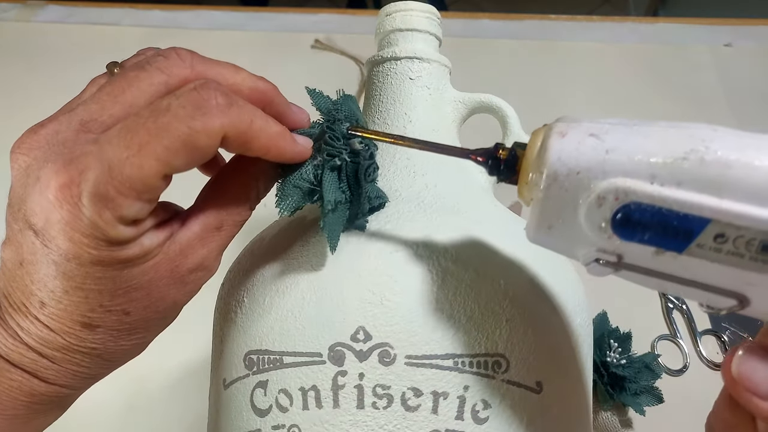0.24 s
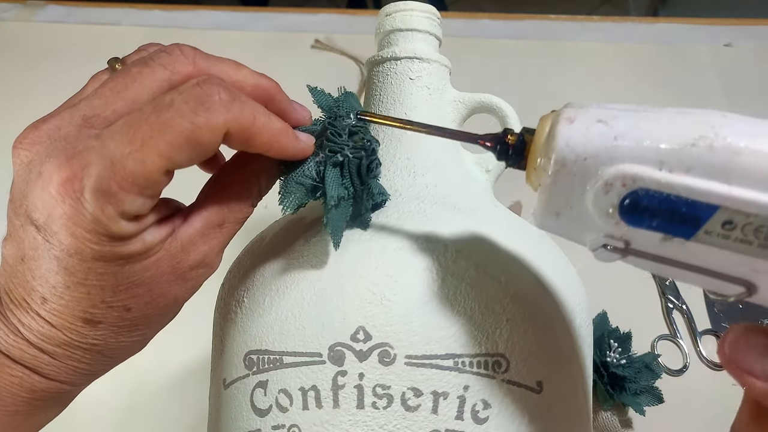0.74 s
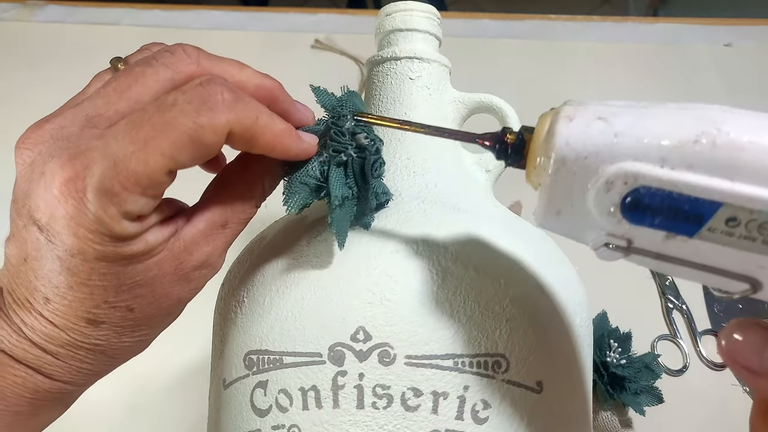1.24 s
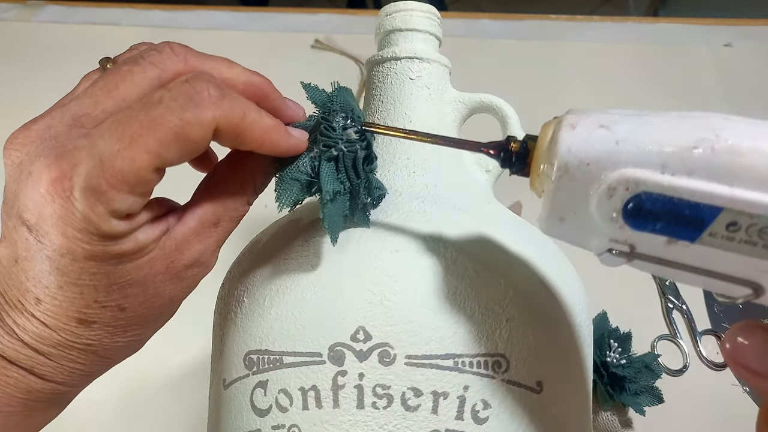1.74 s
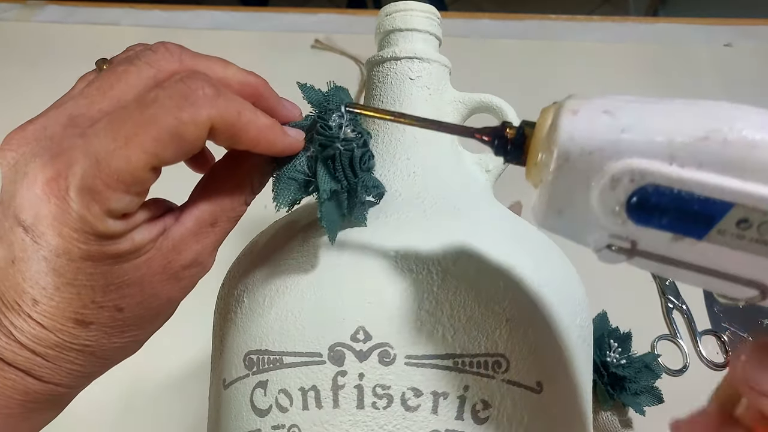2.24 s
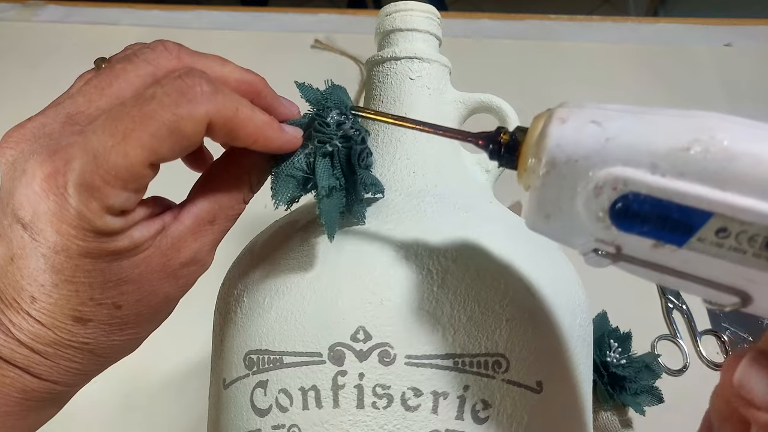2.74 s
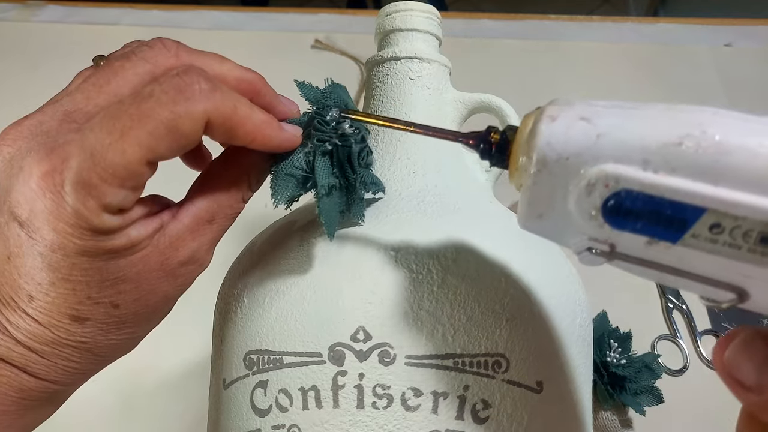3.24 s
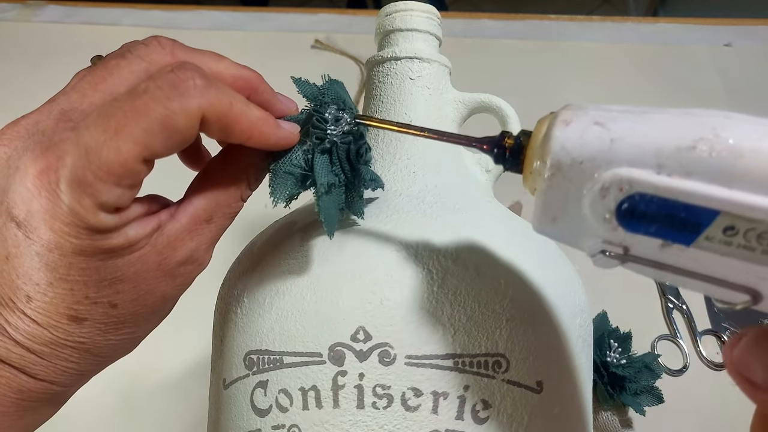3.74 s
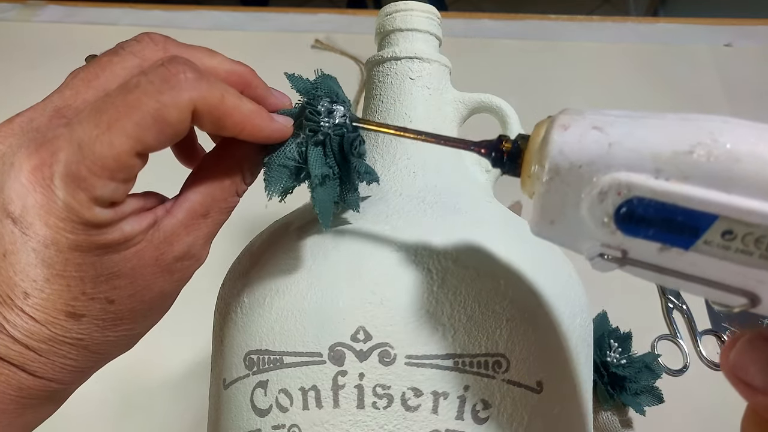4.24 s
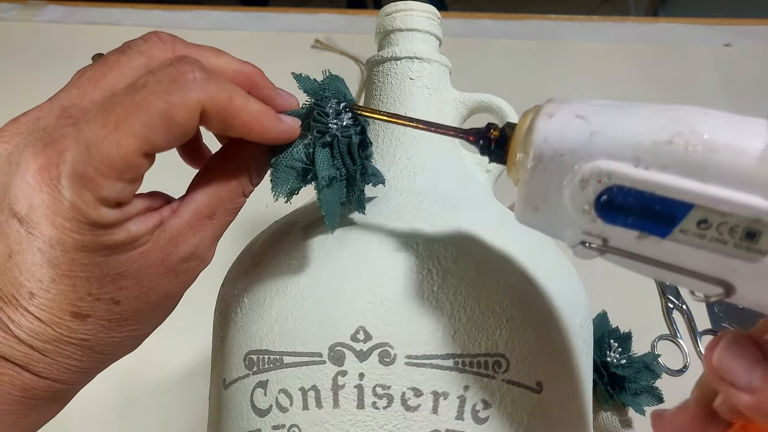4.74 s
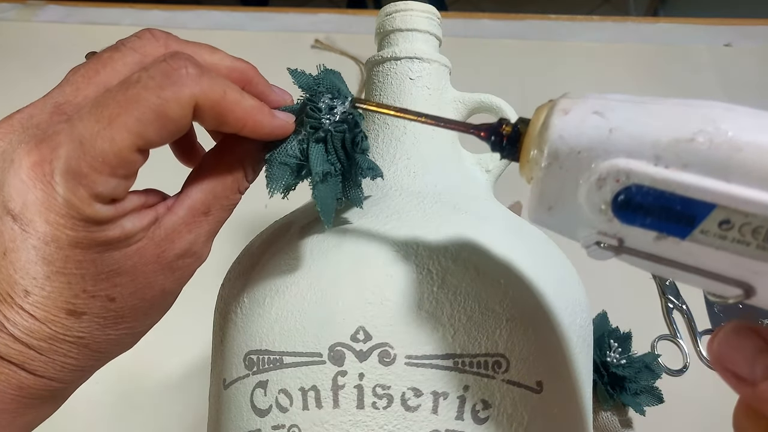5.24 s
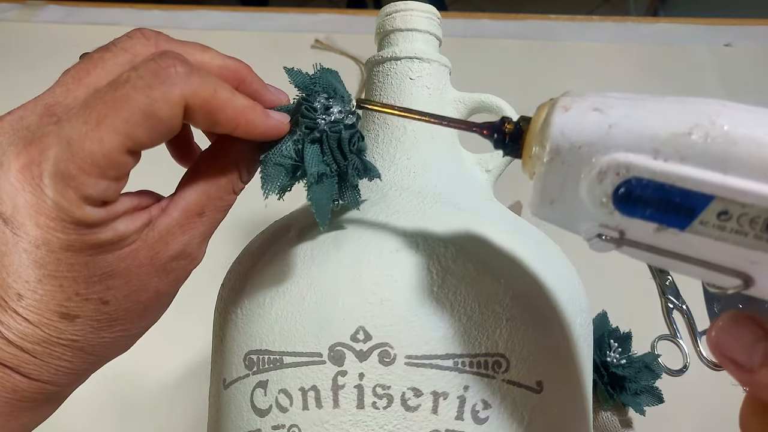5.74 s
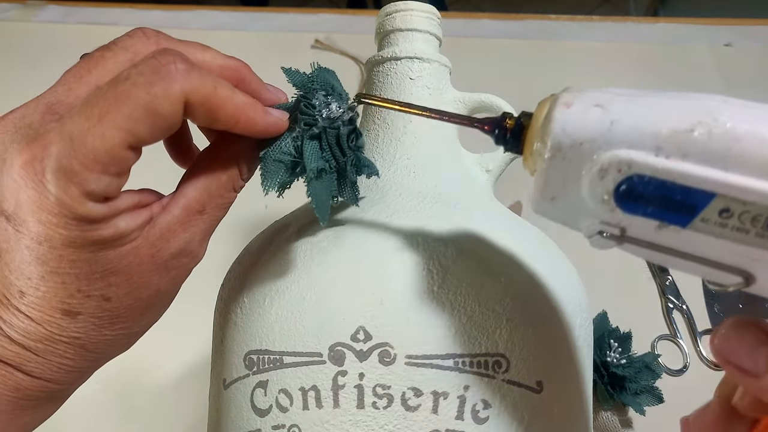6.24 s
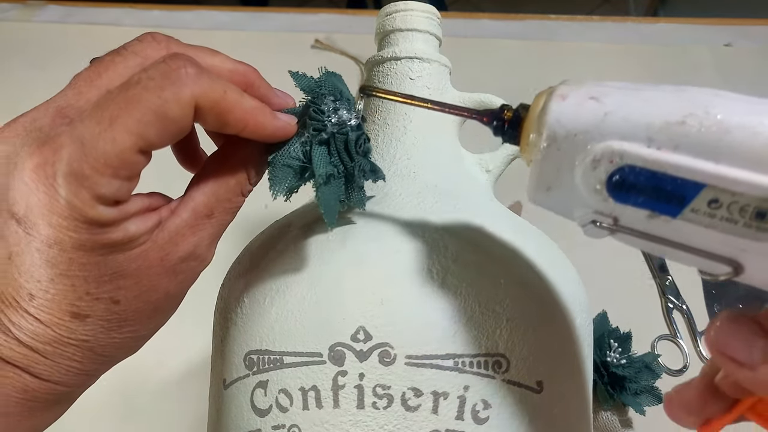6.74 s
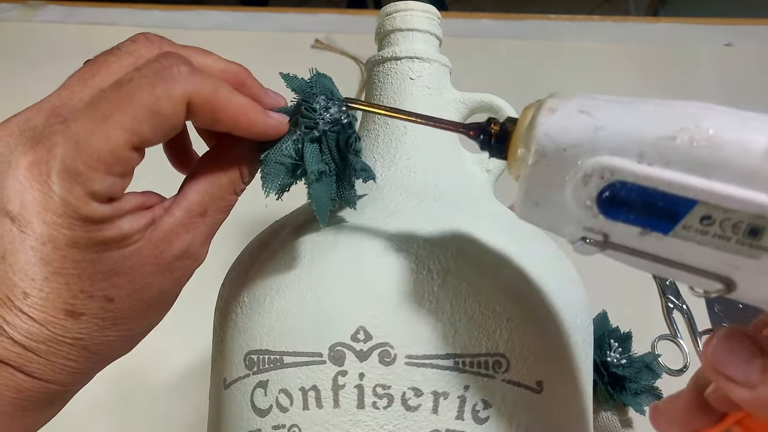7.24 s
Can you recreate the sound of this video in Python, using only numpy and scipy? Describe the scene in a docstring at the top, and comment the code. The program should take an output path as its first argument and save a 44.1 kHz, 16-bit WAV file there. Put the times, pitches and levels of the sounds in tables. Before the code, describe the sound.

Close to the microphone, a hot glue gun is squeezed three times in a quiet indoor room. The plastic trigger creaks in rapid tiny ticks, then slips in coarser, louder clicks. Each release is a quick fading chatter with a soft scrape. After the first, the mechanism snaps loudly. A short slap echo follows every sound over a faint hum.

```python
"""At a craft table in a quiet, faintly humming room, a hot glue gun is squeezed three times.
The trigger creaks and clicks by stick-slip: it holds, lets go, and holds again. Let go, it chatters
back on its spring while the carriage rubs; once the feed mechanism snaps loudly. Each slip is a short
burst of noise plus ringing modes, and the rub is coloured noise with uneven grip. All the sounds of
the gun come again a moment later as a compressed, roomy slap echo."""
import sys
import numpy as np
from scipy import signal
from scipy.fft import rfft, irfft
from scipy.io import wavfile
from scipy.ndimage import uniform_filter1d

SR = 44100
rng = np.random.default_rng(int(sys.argv[2]) if len(sys.argv) > 2 else 0)


def unload_audio(sound):
    """Save the sound as a 16-bit wav file, at the path given as the first command line argument."""
    columns = np.transpose(np.atleast_2d(sound))
    # keep every value between -1 and 1, then stretch to whole-number steps
    steps = np.round(np.clip(columns, -1, 1) * 32767)
    wavfile.write(sys.argv[1], SR, steps.astype(np.int16))


N = 330309
CLICK_SIZE = 8192  # samples in one click
ATTACK_SIZE = 220  # samples (5 ms) over which a level is judged


def amp(db):
    """Turn decibels into a factor on the wave."""
    return 10 ** (np.asarray(db) / 20)


def evened(x):
    """Scale a sound to an RMS level of 1."""
    return x / np.sqrt(np.mean(x ** 2) + 1e-20)


def read_curve(points, hz):
    """Read a curve by straight lines between its points on a log-frequency axis."""
    f, value = np.transpose(points)
    return np.interp(np.log(hz + 1), np.log(f + 1), value)


def add(mix, s, sound):
    """Add a sound to the mix from s seconds on, cut off at the end of the mix."""
    part = mix[max(round(s * SR), 0):][:len(sound)]
    part += sound[:len(part)]


def coloured(x, points):
    """Filter to a dB spectrum with the least delay (minimum phase), so nothing sounds early."""
    size = x.shape[-1]
    gain_db = read_curve(points, abs(np.fft.fftfreq(size, 1 / SR)))
    # the Hilbert transform finds the phase that belongs to this gain
    response = np.exp(np.conj(signal.hilbert(np.log(amp(gain_db)))))
    return irfft(rfft(x) * response[:size // 2 + 1], size)


def room_tone(waver=.25):
    """Steady air is noise shaped in frequency; the faint hum is sine tones whose phase (rad) wanders."""
    # colour of the air: [f/Hz, relative level/dB]
    air_colour = [(12, -35.5), (20, -6), (43, -10.5), (113, -21.5), (158, -1.5), (216, -8.5), (285, -4),
                  (357, -10.5), (399, -7), (446, -13), (873, -14.5), (1440, -20.5), (2320, -24),
                  (13900, -30.5), (16000, -30.5)]
    # tones of the hum: [f/Hz, level/dB]
    hum_tones = [(156.1, -74.5), (199.2, -84)]
    air_db = -66
    air_gain = amp(read_curve(air_colour, np.fft.rfftfreq(N, 1 / SR)))
    air = irfft(rfft(rng.standard_normal(N)) * air_gain, N)
    t = np.arange(N) / SR
    knots = np.linspace(0, N / SR, 40)
    hum = np.zeros(N)
    for hz, db in hum_tones:
        wander = waver * np.interp(t, knots, rng.standard_normal(len(knots)))
        hum += amp(db) * np.sqrt(2) * np.sin(2 * np.pi * hz * t + wander)
    return amp(air_db) * evened(air) + hum


def room(x):
    """Sparse reflections of random sign blur the sound, each band dying at its own speed."""
    # time the room takes to fade by 60 dB: [f/Hz, t60/s]
    room_t60 = [(300, .35), (1500, .31), (4000, .27), (9000, .27), (15000, .22)]
    reflections_per_s = 6000
    hits = rng.random(SR) < reflections_per_s / SR
    taps = rng.choice([-1., 1.], SR) * hits
    hz, t, bands = signal.stft(taps, SR, nperseg=256)
    fade = amp(-60 * t / read_curve(room_t60, hz)[:, None])
    tail = signal.istft(bands * fade, SR, nperseg=256)[1]
    return signal.fftconvolve(x, tail / np.linalg.norm(tail))[:N]


def slap_echo(x, recovery_db=120, room_db=-6):
    """A late, roomy copy whose compressor lifts faint ticks and holds back loud ones."""
    # the compressor: [level/dB, gain/dB]
    echo_gain = [(-68, 12), (-54, 6), (-38, 0), (-25, -4.5), (-14, -18)]
    # colour of the echo: [f/Hz, gain/dB]
    echo_colour = [(100, -8), (650, -1.5), (1400, -3.5), (3500, -1.5), (7000, -5.5), (10000, -1),
                   (15000, -7)]
    delay_s = .056
    power_db = 10 * np.log10(abs(uniform_filter1d(x ** 2, ATTACK_SIZE)) + 1e-12)
    # the level reading jumps up with the sound but falls by only so many dB a second
    fall = np.arange(N) * recovery_db / SR
    held_db = np.maximum.accumulate(power_db + fall) - fall
    gain_db = np.interp(held_db, *np.transpose(echo_gain))
    squashed = coloured(x * amp(gain_db), echo_colour)
    out = np.zeros(N)
    add(out, delay_s, squashed + amp(room_db) * room(squashed))
    return out


def slide(rough_db=3, rough_size=130):
    """The feed carriage rubs back along the glue stick: noise with a grainy, uneven grip."""
    # loudness of the rub, one table for each slide: [t/s, level/dB]
    slide_levels = [
        [(2.15, -55.5), (2.22, -53.5), (2.32, -69), (2.41, -65)],
        [(4.33, -50.5), (4.42, -52.5), (4.5, -68.5), (4.62, -71)],
        [(6.07, -54), (6.16, -50), (6.24, -61.5), (6.34, -86.5)],
    ]
    # colour of the rub: [f/Hz, relative level/dB]
    slide_colour = [(100, -21.5), (450, -14), (650, 5.5), (1000, -10.5), (1250, -9), (1420, 8),
                    (1650, -5.5), (2800, -3.5), (5000, -9.5), (9500, -18), (15000, -24)]
    t = np.arange(N) / SR
    pressure = np.zeros(N)
    for curve in slide_levels:
        # practically silent before and after each slide
        pressure += amp(np.interp(t, *np.transpose(curve), left=-200, right=-200))
    grip = amp(rough_db * evened(uniform_filter1d(rng.standard_normal(N), rough_size)))
    return pressure * evened(coloured(grip * rng.standard_normal(N), slide_colour))


def clicks(rows, modes, colour, rise_s, crack_s, rattle_db, rattle_s, scatter_db, detune, alike):
    """Each slip is a short crack with a weak rattle after it, and sets the modes of the gun ringing."""
    t = np.arange(CLICK_SIZE) / SR
    # the same shell answers every slip in partly the same way
    alike = np.clip(alike, 0, 1)
    shared = rng.standard_normal(CLICK_SIZE)
    own = rng.standard_normal((len(rows), CLICK_SIZE))
    grain = np.sqrt(alike) * shared + np.sqrt(1 - alike) * own
    rise = 1 - np.exp(-t / rise_s)
    decay = np.exp(-t / crack_s) + amp(rattle_db) * np.exp(-t / rattle_s)
    sounds = coloured(grain * rise * decay, colour)
    sounds /= np.std(sounds[:, :ATTACK_SIZE], axis=1, keepdims=True)
    for hz, db, t60 in modes:
        # grip and point of contact change the strength, tuning and phase of a mode from slip to slip
        strength, grip, phase = rng.standard_normal((len(rows), 3)).T[:, :, None]
        ring = np.sin(2 * np.pi * (hz * (1 + detune * grip) * t + phase))
        sounds += amp(scatter_db * strength) * ring * (rise * amp(db - 60 * t / t60))

    # a sharper slip puts more of its energy above the crossover
    crossover_hz = 4800
    low = signal.butter(2, crossover_hz, "low", fs=SR, output="sos")
    high = signal.butter(2, crossover_hz, "high", fs=SR, output="sos")
    # each filter is used twice, for a steeper split
    bodies = signal.sosfilt(low, signal.sosfilt(low, sounds))
    trebles = signal.sosfilt(high, signal.sosfilt(high, sounds))
    out = np.zeros(N)
    for (s, body_db, treble_db), body, treble in zip(rows, bodies, trebles):
        body = body / np.std(body[:ATTACK_SIZE])
        treble = treble / np.std(treble[:ATTACK_SIZE])
        add(out, s, amp(body_db) * (body + amp(treble_db) * treble))
    return out


def creak_slips(curve, jitter, uneven_db):
    """Stick-slip: the trigger holds for an uneven time, and a longer hold lets go harder."""
    s, rate, body_db, treble_db = np.transpose(curve)
    now, rows = s[0], []
    for chance in rng.standard_normal(120):
        now += np.exp(jitter * chance) / np.interp(now, s, rate)
        if now < s[-1]:
            level_db = np.interp(now, s, body_db) + uneven_db * chance
            rows.append((now, level_db, np.interp(now, s, treble_db)))
    return rows


def slip_run(start, length, gap, first_db, treble_db, ratio, db_per_s, treble_db_per_s, uneven_db):
    """A run of slips whose gaps change by a steady ratio while level and brightness drift."""
    times = np.append(0, np.cumsum(gap * ratio ** np.arange(24)))
    rows = []
    for t, chance in zip(times, rng.standard_normal(len(times))):
        if t < length:
            level_db = first_db + db_per_s * t + uneven_db * chance
            rows.append((start + t, level_db, treble_db + treble_db_per_s * t))
    return rows


def creak():
    """Fine creak: many small stick-slips of the trigger through each squeeze."""
    # one table for each squeeze: [t/s, slips per second, body level/dB, treble over body/dB]
    creak_curves = [
        [(0, 158, -48, 2.5), (.2, 131, -48, -14), (.4, 90, -50, -4), (.7, 53, -52, 5)],
        [(2.71, 262, -65, -15), (2.76, 239, -56, -6), (2.8, 187, -46.5, -1.5), (2.86, 124, -47, 1),
         (2.95, 110, -47.5, -11), (3.17, 80, -42, -3)],
        [(4.89, 63, -62, -19), (4.94, 90, -55, -3.5), (5.0, 145, -46.5, 2), (5.08, 133, -46, -3.5),
         (5.2, 103, -48.5, -4.5), (5.38, 58, -42, -3)],
    ]
    # what the gun rings with when it creaks: [f/Hz, relative level/dB, t60/s]
    creak_modes = [(2543, -8, 0.049), (3880, -11, .025), (5800, -20, .03), (6400, -11, 0.023),
                   (9160, -13.5, 0.028)]
    # colour of the plastic crack: [f/Hz, relative level/dB]
    creak_crack = [(80, -19), (400, -12.5), (650, -0.5), (1000, -6.5), (1700, 0), (3500, 1.5), (4800, -4.5),
                   (6100, 6.5), (7500, -5.5), (9300, -6), (11000, -15), (15500, -23)]
    rows = []
    for curve in creak_curves:
        rows += creak_slips(curve, jitter=.14, uneven_db=.5)
    return clicks(rows, creak_modes, creak_crack, rise_s=.0001, crack_s=.0008, rattle_db=-24,
                  rattle_s=.006, scatter_db=3, detune=.012, alike=.2)


def squeeze():
    """Coarse slips under pressure: within a run each hold lasts longer and the slips tend to grow."""
    # single slips, faint to loud: [t/s, body level/dB, treble over body/dB]
    single_slips = [(.0308, -37, 3), (.0614, -42, 3), (.0983, -39.5, 8), (.1423, -34.5, 3), (.1788, -33, 2),
                    (.2122, -36.5, 3), (.2677, -29, 4), (.3242, -32, -14), (.511, -31.5, -1.5),
                    (.5601, -37.5, 7.5), (.5784, -24.5, -8), (.6193, -25.5, -11), (.6505, -26.5, -9),
                    (.6882, -24, -8), (.7463, -26.5, -12), (.7826, -32.5, 1), (.8188, -24, -10),
                    (.8644, -39.5, -1), (.9254, -24, -10), (1.0989, -26.5, -8.5), (3.1972, -28, -8),
                    (3.2536, -37, 2.5), (3.2747, -21.5, -4.5), (5.3275, -26.5, -7), (5.3592, -28.5, -7),
                    (5.4099, -26.5, -6.5), (5.4438, -46.5, 0), (5.4821, -37, -17)]
    # runs of slips: [start t/s, length/s, first gap/s, first level/dB, first treble over body/dB]
    squeeze_runs = [(0.311, .175, .0372, -34.5, 0.5), (0.3842, .175, 0.027, -37.5, -11.5),
                    (2.829, .175, 0.012, -43, -3), (3.019, .07, .0185, -38, -15),
                    (3.1084, .07, .0275, -30, -8), (5.1922, .11, .0181, -34.5, -7)]
    # what the loaded gun rings with: [f/Hz, relative level/dB, t60/s]
    loaded_modes = [(36, -33.5, 0.18), (655, -20.5, 0.04), (1420, -14, 0.043), (1800, -12, .018),
                    (2480, -14, .03), (2725, -16.5, 0.11), (3300, -20, 0.056), (3710, -10, 0.036),
                    (4100, -16, 0.055), (4860, -15, .02), (6450, -13.5, 0.026), (7700, -20.5, 0.027),
                    (9780, -21, .025)]
    # colour of the plastic crack: [f/Hz, relative level/dB]
    loaded_crack = [(80, -18), (170, -12), (450, -15), (650, -1.5), (1000, -17.5), (1250, -11), (1900, 2.5),
                    (2300, -4), (3700, 2), (5000, -10), (6500, -6.5), (8500, -12), (10000, -11),
                    (11500, -22), (15500, -27)]
    rows = list(single_slips)
    for run in squeeze_runs:
        rows += slip_run(*run, ratio=1.027, db_per_s=19.5, treble_db_per_s=-11.5, uneven_db=1.0)
    return clicks(rows, loaded_modes, loaded_crack, rise_s=.00015, crack_s=.0015, rattle_db=-19,
                  rattle_s=.0077, scatter_db=2, detune=.008, alike=.08)


def spring_back():
    """The trigger chatters back: as the spring slackens the gaps shrink and the slips fade and dull."""
    # chatters: [start t/s, length/s, first gap/s, first level/dB, first treble over body/dB]
    release_runs = [(2.1526, .058, .0148, -36, -0.5), (4.3257, .095, .021, -25.5, 4.5),
                    (6.0926, .088, .02, -30, 7.5)]
    # single ticks as the mechanism comes loose or settles: [t/s, body level/dB, treble over body/dB]
    single_ticks = [(2.1236, -46, -17), (2.3094, -52, -10), (4.4488, -41, -7), (4.4853, -47.5, -22),
                    (4.5038, -50.5, -21), (6.0682, -27, 4.5), (6.2304, -48, -23), (6.264, -52.5, -22.5),
                    (6.4302, -49, -5), (6.6616, -57.5, -13), (6.6917, -62.5, -28), (6.7284, -67, -26),
                    (6.76, -70.5, -29), (6.9348, -59, -17), (7.1158, -58.5, -12.5)]
    # what the gun rings with when let go: [f/Hz, relative level/dB, t60/s]
    free_modes = [(35.7, -27.5, 0.2), (670, -9.5, .018), (1426, -14, 0.042), (2280, -12.5, 0.046),
                  (2700, -14.5, 0.07), (2820, -15.5, .025), (3510, -13, 0.04), (4640, -15.5, .025),
                  (5850, -12, 0.011), (6753, -14.5, .03), (7250, -12.5, .03), (9320, -13, 0.036),
                  (13570, -15, .035)]
    # colour of the plastic crack: [f/Hz, relative level/dB]
    free_crack = [(150, -19), (450, -19.5), (640, -1), (1050, -17.5), (1900, -4), (2900, 1), (4300, -0.5),
                  (5400, -3.5), (7000, 1.5), (8300, -7.5), (9700, -3), (11800, -12), (14500, -7.5),
                  (16000, -13.5)]
    rows = list(single_ticks)
    for run in release_runs:
        rows += slip_run(*run, ratio=.88, db_per_s=-150, treble_db_per_s=-60.5, uneven_db=-1.06)
    return clicks(rows, free_modes, free_crack, rise_s=.00029, crack_s=.0015, rattle_db=-17,
                  rattle_s=.0093, scatter_db=2.5, detune=.008, alike=.1)


def snap():
    """The feed mechanism snaps: clicks with a slower rise and short, mostly low-pitched ringing."""
    # snaps, one of them loud: [t/s, body level/dB, treble over body/dB]
    snap_slips = [(2.4173, -33, -5), (2.4215, -13.5, -14), (2.628, -54, -17), (2.6325, -39, -5)]
    # what the gun rings with when it snaps: [f/Hz, relative level/dB, t60/s]
    snap_modes = [(36, -35.5, .15), (835, -0.5, .014), (1494, 1, .026), (1675, 1.5, 0.023),
                  (2000, -10.5, .022), (2760, -10.5, 0.02), (3280, -6, 0.021), (4830, -13, .02),
                  (6900, -14.5, .025)]
    # colour of the plastic crack: [f/Hz, relative level/dB]
    snap_crack = [(60, -29), (200, -19.5), (520, -24), (800, -3), (1100, -17), (1600, 4), (2300, -4.5),
                  (3200, -2.5), (4300, -15.5), (6700, -10), (8500, -26), (10500, -29.5), (15000, -42)]
    return clicks(snap_slips, snap_modes, snap_crack, rise_s=.0011, crack_s=.0016, rattle_db=-23,
                  rattle_s=.009, scatter_db=1, detune=.015, alike=.1)


def glue_gun():
    """Fine creak, coarse slips under pressure, the spring's return with its rub, and the snaps."""
    return creak() + squeeze() + spring_back() + slide() + snap()


def scene(near_room_db=-24):
    """The gun close by with little room, its echo, and the room tone."""
    gun = glue_gun()
    near = gun + amp(near_room_db) * room(gun)
    return (near + slap_echo(gun) + room_tone())[None]


def record(dry):
    """The recorder's band limit: a steep low-pass filter takes away the highest treble."""
    edge_hz = 16000
    low_pass = signal.firwin(301, edge_hz, window=("kaiser", 9), fs=SR)
    return signal.oaconvolve(dry, low_pass[None], "same")


dry = scene()
out = record(dry)
unload_audio(out)
```